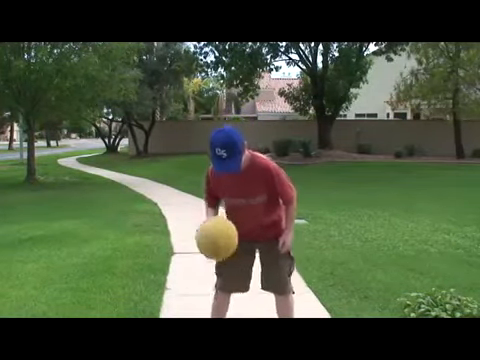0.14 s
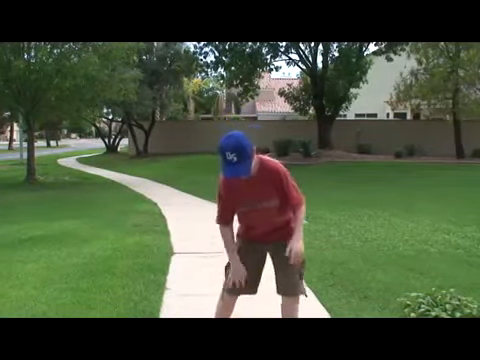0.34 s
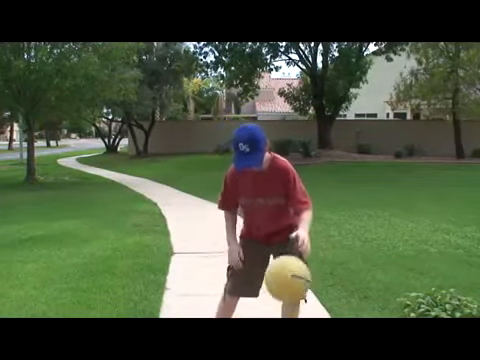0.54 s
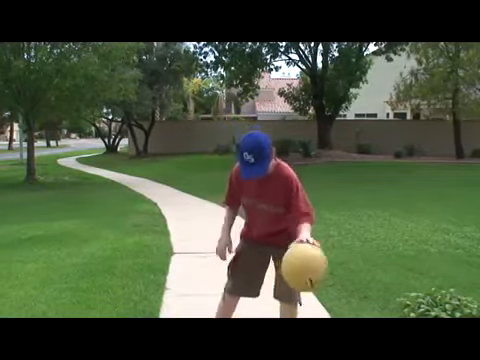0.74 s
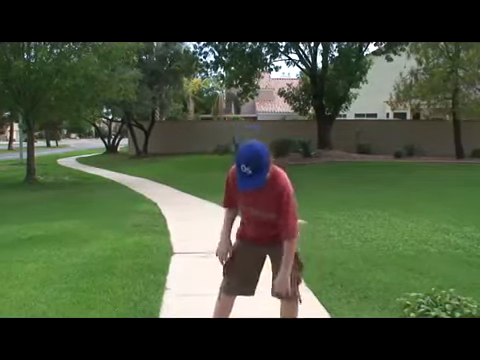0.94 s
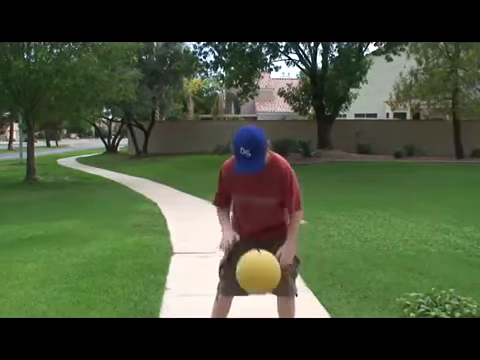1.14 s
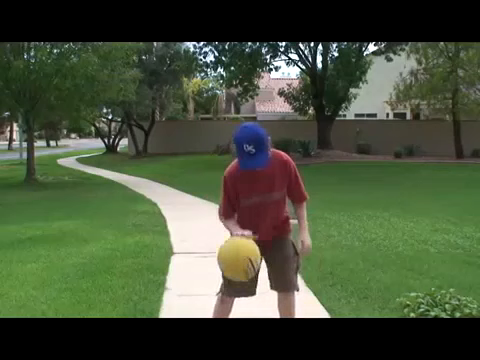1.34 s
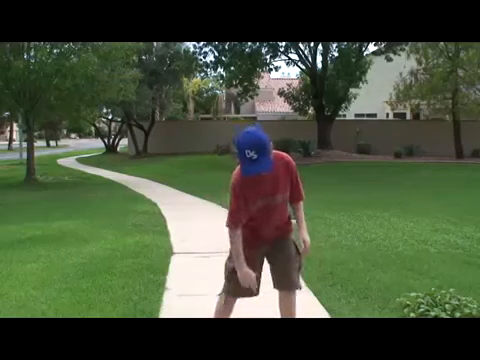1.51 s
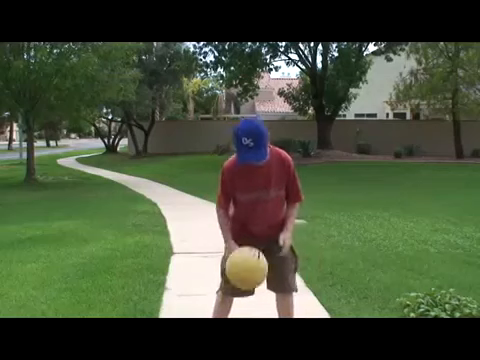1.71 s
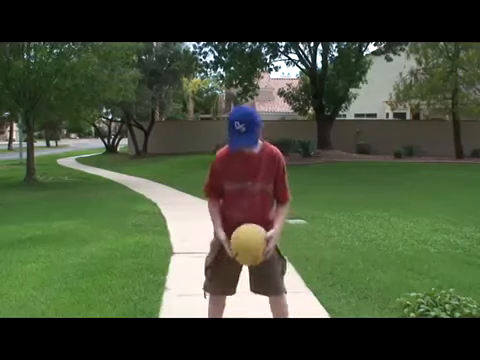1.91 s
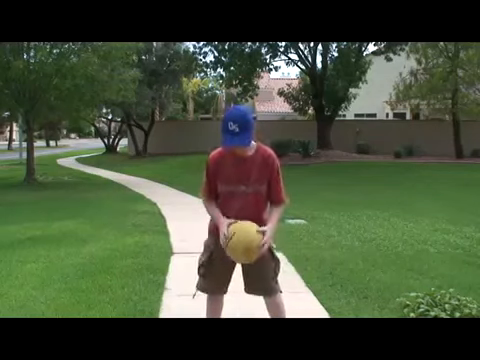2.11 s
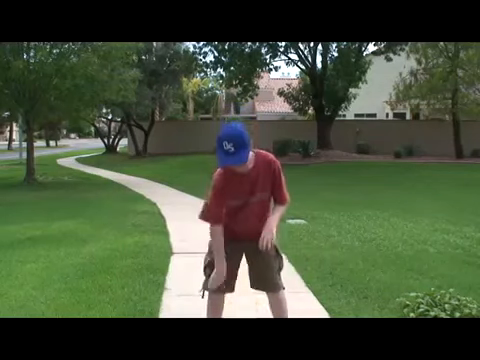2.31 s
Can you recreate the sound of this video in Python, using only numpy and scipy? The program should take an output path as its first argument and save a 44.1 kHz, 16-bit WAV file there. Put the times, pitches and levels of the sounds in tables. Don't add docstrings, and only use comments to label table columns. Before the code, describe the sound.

Outdoors in a park, a ball is dribbled by hand on concrete, giving dry, hollow double-edged smacks. Small birds whistle faintly over town hiss and a low machine hum; after a brief dip the sound turns mono and muffled.

```python
import sys
import numpy as np
from scipy import signal
from scipy.io import wavfile
from scipy.ndimage import uniform_filter1d

SR = 44100
rng = np.random.default_rng(int(sys.argv[2]) if len(sys.argv) > 2 else 0)


def ratio(d):
    e = np.asarray(d, float) / 20
    return 10 ** e


def generate_wav(signal):
    frames = np.transpose(np.atleast_2d(signal))
    scaled = np.clip(frames, -1, 1) * 32767
    pcm = np.round(scaled).astype(np.int16)
    wavfile.write(sys.argv[1], SR, pcm)


N = 108265
LEFT_RIGHT = np.array([[1], [-1]])


def unit(x):
    return x / np.sqrt(np.mean(x ** 2))


def band(x, hz, width_hz):
    return signal.lfilter(*signal.iirpeak(hz, hz / width_hz, SR), x)


def walk(rate_hz):
    hold = int(SR / rate_hz)
    steps = np.repeat(rng.standard_normal(N // hold + 1), hold)
    return 1.31 * uniform_filter1d(uniform_filter1d(steps, hold), hold)[:N]


def ring(t, modes, scale_hz, rise_s):
    scatter_db, jitter = 2.5, .005
    hz, db, t60_s = np.array(modes).T
    chance = rng.standard_normal((len(modes), 3))
    after = np.maximum(t, 0)[:, None]
    level = ratio(db + scatter_db * chance[:, 0])
    decay = np.exp(-np.log(1000) * after / t60_s)
    pitch_hz = hz * scale_hz * (1 + jitter * chance[:, 1])
    tones = level * decay * np.sin(2 * np.pi * pitch_hz * after + chance[:, 2])
    return tones.sum(axis=1) * (1 - np.exp(-after[:, 0] / rise_s))


def ball():
    # start_s, click_db, shell_hz, shell_db, left_minus_right_db
    slaps = [
        (0.374, -5.5, 892, -20.5, -2.5),
        (0.966, -8, 652, -17, -2.1),
        (1.5508, -7, 565, -14, -2),
        (2.3714, -7, 720, -14.5, 2),
    ]
    # start_s, click_db, shell_hz, shell_db, thump_db
    lifts = [
        (0.3904, -10.5, 681, -16, -20),
        (0.981, -9.5, 760, -16, -21),
        (1.5662, -11.5, 799, -15.5, -22),
        (2.3856, -6, 768, -14.5, -21.5),
    ]
    out = np.zeros((2, N + SR))
    for slap, lift in zip(slaps, lifts):
        slap_s, slap_db, slap_hz, slap_shell_db, pan_db = slap
        lift_s, lift_db, lift_hz, lift_shell_db, thump_db = lift
        first = int(slap_s * SR) - 200
        t = (first + np.arange(SR // 3)) / SR - slap_s
        gap_s = lift_s - slap_s
        press = contact(t, 1.05, 1, .0035, slap_db, slap_hz, slap_shell_db)
        peel = contact(t - gap_s, .45, -1, .001, lift_db, lift_hz, lift_shell_db)
        mid, side = press + peel
        mid = mid + ratio(thump_db) * thump(t, gap_s) + cavity(t - gap_s)
        out[:, first:first + len(t)] += ratio(pan_db / 2 * LEFT_RIGHT) * mid + side * LEFT_RIGHT
    return out[:, :N]


def contact(t, rebound, sign, rise_s, click_db, shell_hz, shell_db):
    # pitch_hz, level_db, t60_s
    skin = [
        (1490, -3, .012),
        (2930, 0, .014),
        (3920, -4, .009),
        (4900, -6, .007),
        (6770, -8, .005),
    ]
    # pitch_ratio, level_db, t60_s
    shell_modes = [
        (1.01, 0, .032),
        (.74, -6, .03),
        (.88, -4, .03),
        (1.17, -3, .035),
        (1.38, -4, .035),
        (1.8, -9, .025),
        (2.35, -12, .02),
    ]
    click_s, crossing_s, crossing_db = .000041, .0017, -9
    grit_hz, grit_width_hz = 2800, 6000
    crackle_db, crackle_s, tail_db, tail_s = -24, .0025, -35.5, .013

    def bump(v):
        return np.exp(-.5 * (v / click_s) ** 2)

    def snap(v):
        swing_back = bump(v - 2.6 * click_s) + .4 * bump(v / 1.4 - 5.6 * click_s)
        return sign * (bump(v) - rebound * swing_back)

    click = sum(ratio(crossing_db * k * k) * snap(t - k * crossing_s) for k in range(3))
    after = np.maximum(t, 0)
    noise = rng.standard_normal((2, len(t))) * (t > 0)
    noise = band(band(noise, grit_hz, grit_width_hz), grit_hz, grit_width_hz)
    crackle = ratio(crackle_db) * np.exp(-after / crackle_s)
    tail = ratio(tail_db) * np.exp(-after / tail_s)
    grit = unit(noise) * (crackle + tail)
    mid = ratio(click_db) * (click + ratio(-16) * ring(t, skin, 0.97, 0.00034) + grit[0])
    rings = [ring(t, shell_modes, shell_hz, rise_s) for _ in range(2)]
    shell = ratio(shell_db) * np.array(rings)
    side = ratio(-12.5) * (ratio(click_db + 5.5) * grit[1] + shell[1])
    return np.array([mid + shell[0], side])


def thump(t, gap_s):
    # pitch_hz, level_db, t60_s
    slab_modes = [
        (146.6, 3, .08),
        (206.3, -2.5, 0.088),
        (261, -6.5, 0.064),
        (370, -9, 0.053),
    ]
    thump_hz, t60_s, rise_s, stop_s = 81, .4, .0015, .003
    after = np.maximum(t, 0)
    squash = np.sin(2 * np.pi * thump_hz * (after - .0003)) * np.exp(-np.log(1000) * after / t60_s)
    rise = 1 - np.exp(-after / rise_s)
    stop = np.exp(-np.maximum(t - gap_s - stop_s, 0) / stop_s)
    slab = ring(t, slab_modes, 0.99, 0.0019) + ratio(-4) * ring(t - gap_s, slab_modes, 1, 0.001)
    return squash * rise * stop + slab


def cavity(t):
    # pitch_hz, level_db, t60_s
    air_modes = [
        (1175, -41, .1),
        (1805, -46, .22),
        (2430, -49, .22),
        (3020, -48, .14),
        (3610, -51, .13),
        (4190, -53, .12),
    ]
    flutter_db, flutter_hz = 4, 89.4
    out = 0
    for mode in air_modes:
        out = out + ring(t, [mode], 0.97, .001) * ratio(flutter_db * walk(flutter_hz)[:len(t)])
    return out


def birds(t):
    # start_s, length_s, from_hz, to_hz, level_db, roughness (0-1)
    notes = [(0.256, 0.043, 3380, 3840, -56.5, 0.5), (0.308, 0.016, 3460, 3300, -59, 0.7),
             (0.449, 0.0763, 2490, 2710, -55, 0), (0.508, .065, 2680, 3100, -56.5, 0.2),
             (0.568, 0.039, 3500, 3410, -60, .3), (0.61, .03, 3380, 2410, -59, 0.1),
             (0.751, 0.047, 2477, 2670, -50, 0), (1.123, 0.032, 3400, 3770, -52, 0.5),
             (1.184, 0.051, 5280, 4900, -53.5, 0.2), (1.191, 0.053, 3150, 3920, -56.5, 0.2),
             (1.23, 0.039, 5900, 4610, -55.5, .1), (1.215, 0.15, 5200, 5200, -69, .45),
             (1.284, 0.018, 3920, 3310, -56, 0.3), (1.349, 0.045, 3220, 4200, -66, .35),
             (1.888, 0.022, 3420, 3900, -55, 0.87), (2.142, 0.059, 3370, 3795, -53.5, 0.74),
             (2.193, 0.026, 3490, 3700, -63, .6)]
    out = np.zeros(N)
    rasp, flutter = walk(500), ratio(2 * walk(120))
    for start_s, length_s, from_hz, to_hz, db, rough in notes:
        u = np.clip((t - start_s) / length_s, 0, 1)
        glide_hz = from_hz + (to_hz - from_hz) * u
        phase = 2 * np.pi * np.cumsum(glide_hz) / SR + (.12 + 3 * rough ** 2) * rasp
        out += ratio(db) * flutter * np.sin(np.pi * u) ** .5 * np.sin(phase)
    return out + ratio(-9) * np.roll(out, 500) + ratio(-15) * np.roll(out, 1300)


def swish(t):
    start_s, length_s, from_hz, to_hz, level_db = .03, .36, 5200, 9300, -75.5
    u = np.clip((t - start_s) / length_s, 0, 1)
    hz = from_hz + (to_hz - from_hz) * np.sqrt(u)
    tone = np.sin(2 * np.pi * np.cumsum(hz) / SR)
    return ratio(level_db) * np.sqrt(np.sin(np.pi * u)) * walk(2200) * tone


def hum():
    # pitch_hz, level_db
    tones = [
        (193.8, -52),
        (387.6, -62),
        (452.2, -64),
        (527.6, -62.5),
    ]
    waver_db, drift_ratio = 1.5, .004
    drift_s = np.cumsum(1 + drift_ratio * walk(12.14)) / SR
    out = 0
    for hz, db in tones:
        tone = ratio(2 + waver_db * walk(30)) * np.sin(2 * np.pi * hz * drift_s)
        haze = ratio(-7) * unit(band(rng.standard_normal(N), hz, 31))
        out = out + ratio(db) * (tone + haze)
    return out


def leaves(t):
    # time_s, level_db
    gusts = [
        (0.0, -78),
        (0.448, -59.5),
        (0.692, -74.5),
        (0.984, -68.5),
        (1.142, -63),
        (1.422, -70.5),
        (1.746, -59),
        (1.868, -72.5),
        (1.9, -84),
    ]
    mid, side = unit(band(rng.standard_normal((2, N)), 5420, 3300))
    breeze = ratio(np.interp(t, *np.array(gusts).T) + 0.37 * walk(16))
    return breeze * (mid + ratio(-9.5) * side * LEFT_RIGHT)


def town():
    # pitch_hz, level_db (per Hz)
    spectrum = [(18, -47), (30, -8), (124, -7), (199, -3.5), (231, -13.5), (380, -10.5), (625, -14),
                (2520, -20.5), (11500, -44.5), (15000, -75), (22000, -120)]
    level_db, wide_db, flicker_db = -49.5, -5, 1.5
    curve_hz, curve_db = np.array(spectrum).T
    out, swell = 0, walk(2.99)
    for hz in 35 * 2 ** np.arange(0, 8.6, .5):
        mid, side = band(band(rng.standard_normal((2, N)), hz, hz / 2), hz, hz / 2)
        db = np.interp(np.log(hz), np.log(curve_hz), curve_db)
        db = db + flicker_db * (swell / 2 + walk(9.55))
        width = ratio(wide_db) * min(0.51 + hz / 3000, 1.6)
        out = out + ratio(db) * (mid + width * side * LEFT_RIGHT)
    return ratio(level_db) * unit(out)


def scene():
    t = np.arange(N) / SR
    park = town() + leaves(t)
    machine = hum() * ratio(.3 * LEFT_RIGHT)
    air = (birds(t) + swish(t)) * ratio(1.5 * LEFT_RIGHT)
    return ball() + park + machine + air


def patchy(x):
    edge_hz, spread_hz, keep_db = 11050, 1000, -68
    width = 8
    mid_side = np.array([x[0] + x[1], x[0] - x[1]]) / 2
    hz, _, z = signal.stft(mid_side, SR, nperseg=1024)
    chance = rng.standard_normal((len(hz) // width + 1, z.shape[2]))
    chance = uniform_filter1d(chance, size=4, axis=1)
    edge = edge_hz + 2 * spread_hz * np.repeat(chance, width, axis=0)[:len(hz)]
    loud = np.abs(z[0, 200:260]).mean(axis=0) > ratio(keep_db)
    z = z * ((hz[:, None] // 345 * 345 < edge) | loud)
    z[1] *= hz[:, None] < 11800
    mid, side = signal.istft(z, SR, nperseg=1024)[1][:, :N]
    return np.array([mid + side, mid - side])


def band_limit(x):
    return signal.sosfilt(signal.butter(12, 14120, fs=SR, output="sos"), x)


def record(dry):
    change_s, fade_out_s, fade_in_s = 1.9065, .015, .036
    t = np.arange(N) / SR - change_s
    dry = signal.sosfiltfilt(signal.butter(2, 48.4, "high", fs=SR, output="sos"), dry)
    dry = signal.sosfilt(signal.butter(4, 12800, fs=SR, output="sos"), dry)
    dry = patchy(dry)
    mono = dry.mean(axis=0)
    dull = signal.sosfilt(signal.butter(7, 4700, fs=SR, output="sos"), mono)
    dull = dull + ratio(-34) * mono
    first = np.maximum(np.clip(-t / .001, 0, 1), ratio(-24) * np.clip(1 - t / fade_out_s, 0, 1))
    fade_in = 1 - np.exp(-np.maximum(t - fade_out_s, 0) / fade_in_s)
    second = (t > 0) * (ratio(-36) + ratio(-0.5) * fade_in)
    top_cut = signal.ellip(8, .2, 70, 13300, fs=SR, output="sos")
    mix = signal.sosfilt(top_cut, first * dry + second * dull)
    return band_limit(mix)


dry = scene()
out = record(dry)
generate_wav(out)
```